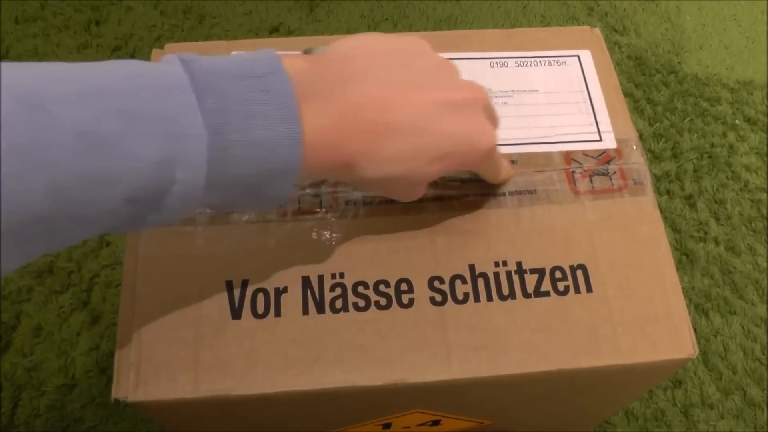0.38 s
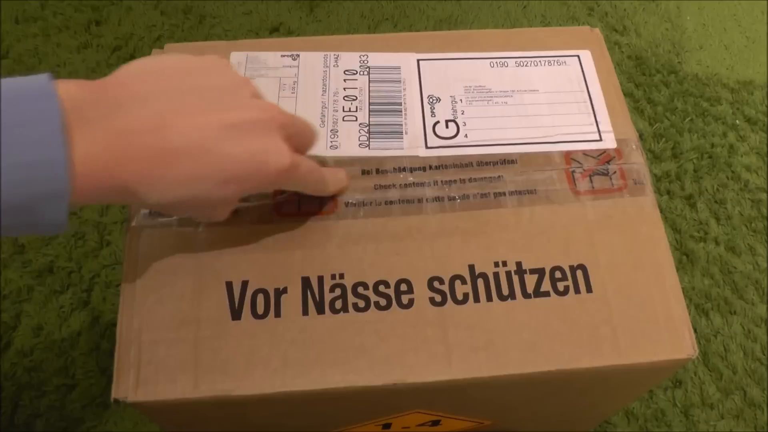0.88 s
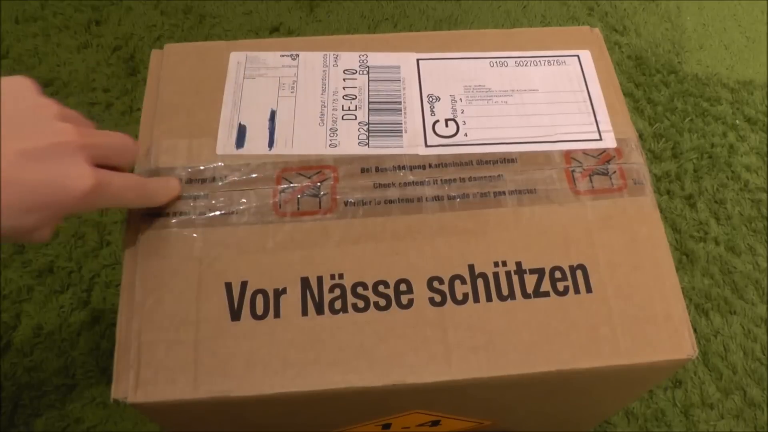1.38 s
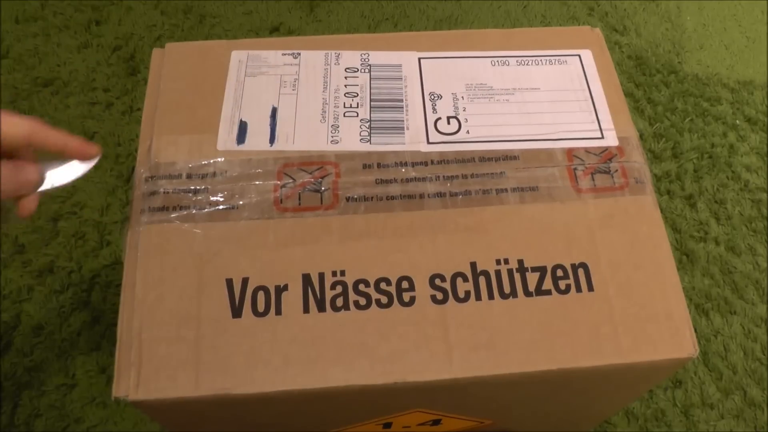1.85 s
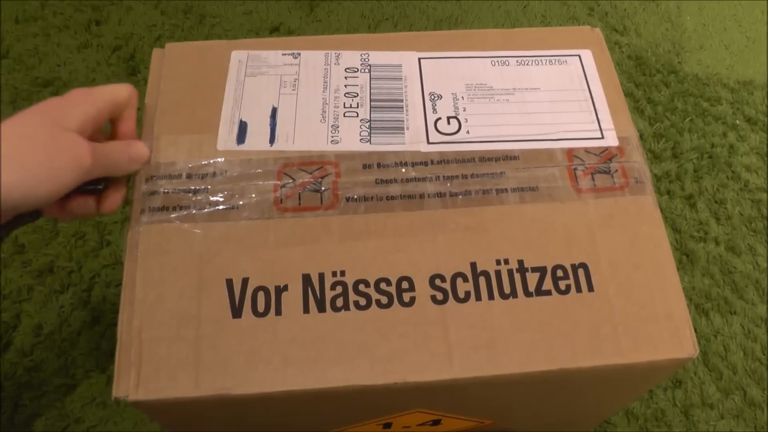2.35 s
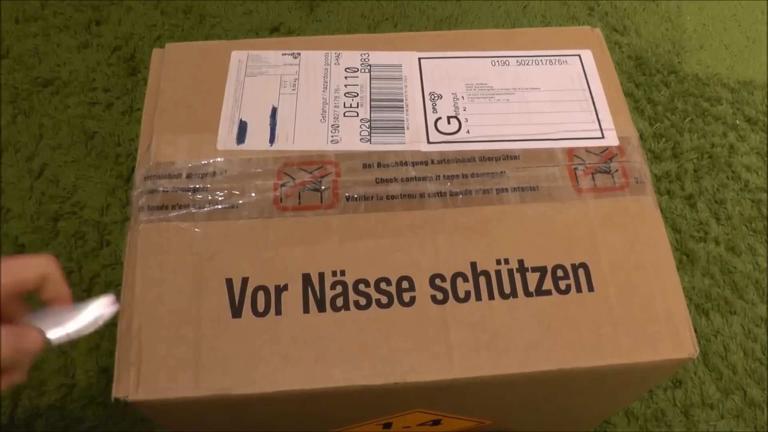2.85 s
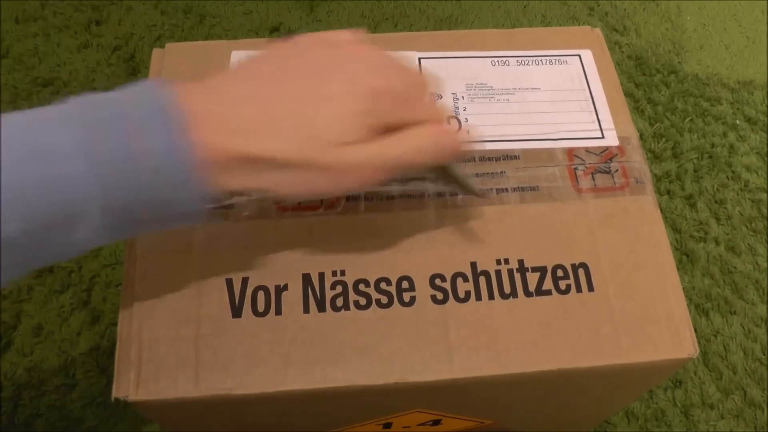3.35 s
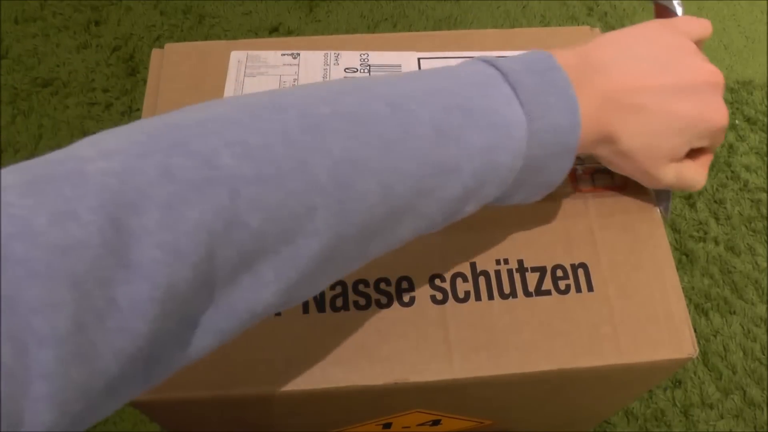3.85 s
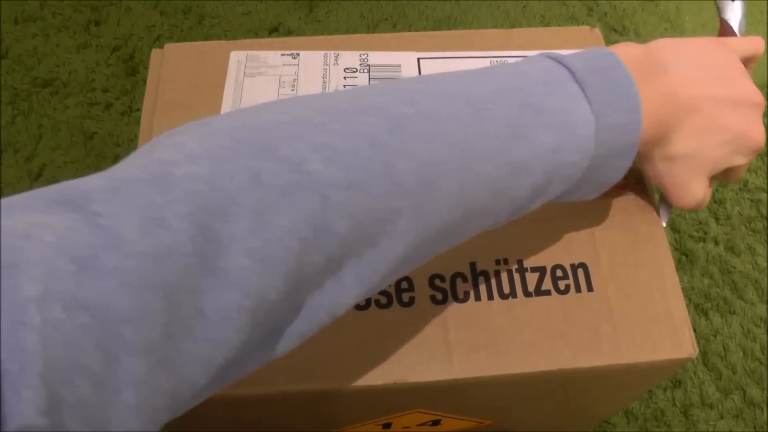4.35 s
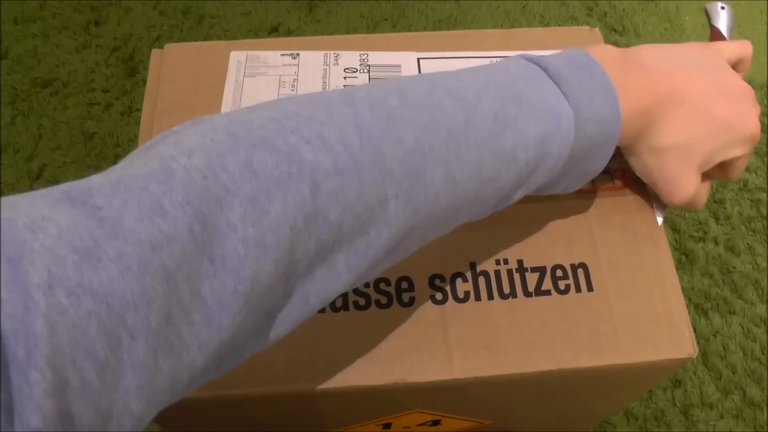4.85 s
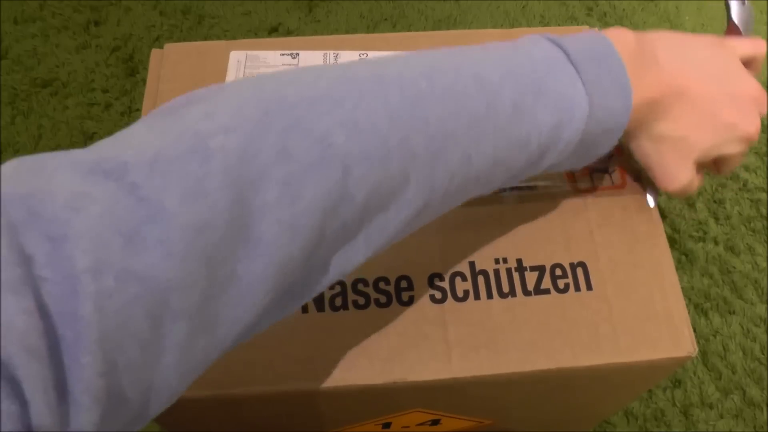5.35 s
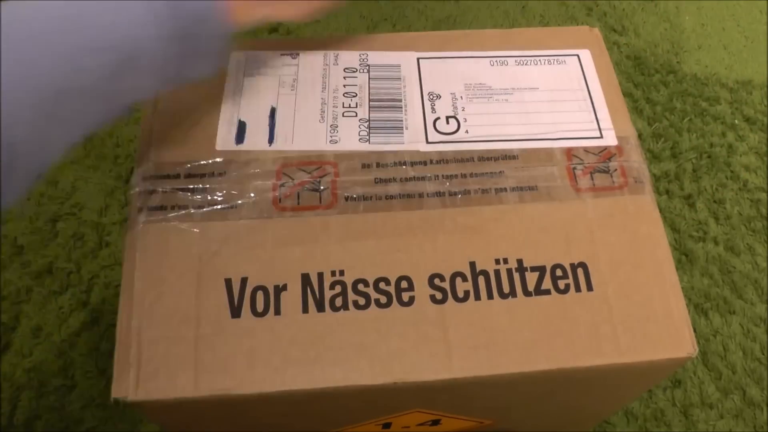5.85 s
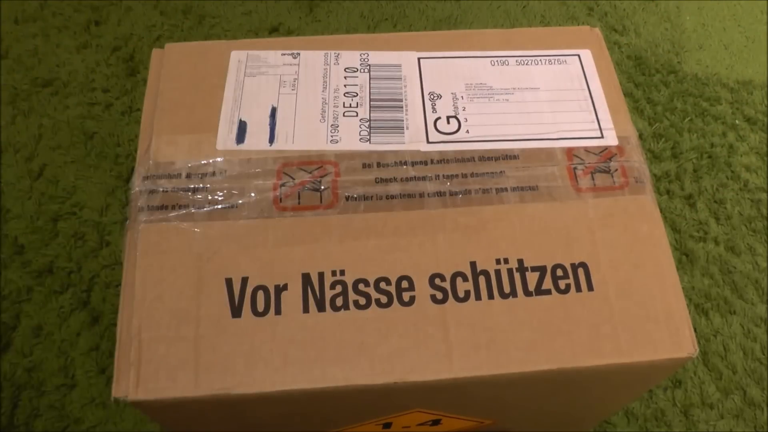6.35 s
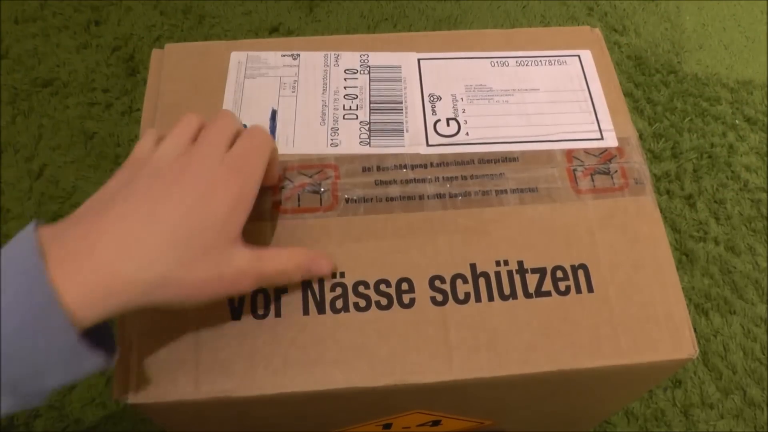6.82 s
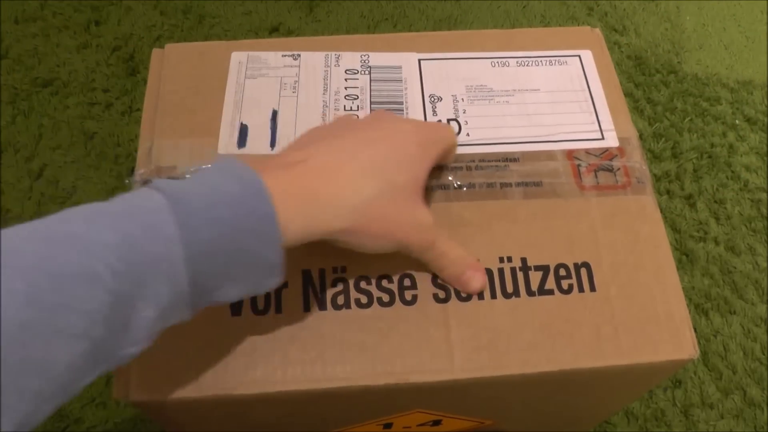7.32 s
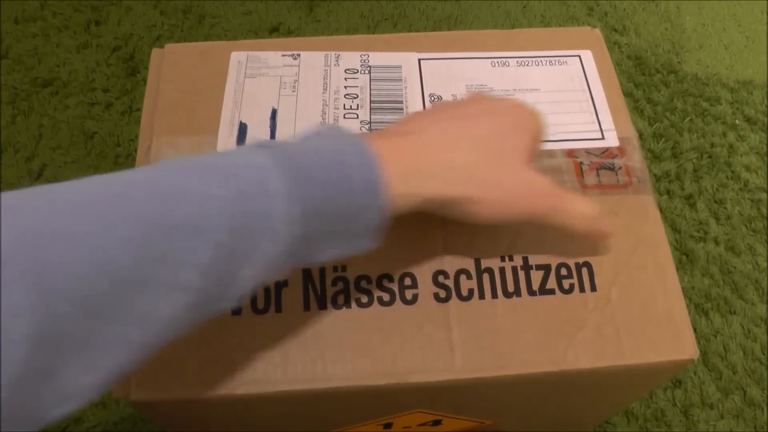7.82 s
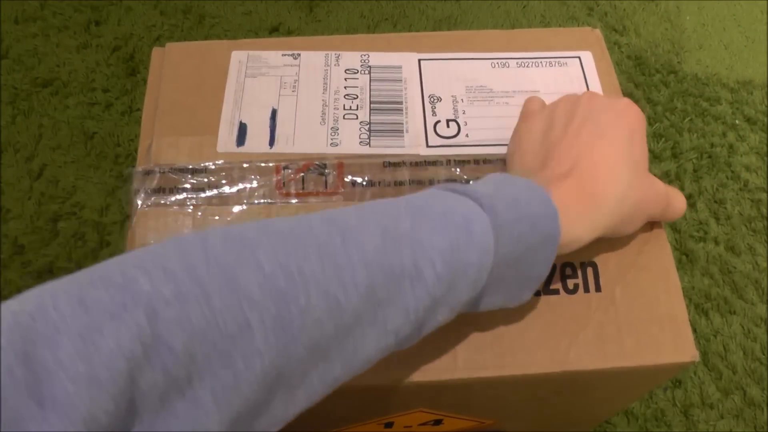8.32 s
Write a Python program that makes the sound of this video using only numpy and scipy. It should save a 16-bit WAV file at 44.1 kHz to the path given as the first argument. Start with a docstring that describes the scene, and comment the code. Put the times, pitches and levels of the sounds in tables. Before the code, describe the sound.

Close up in a small, soft, quiet room, a knife rips along the tape of a cardboard box: dense bright snaps, rasping scrape, a tiny rising squeak and hollow box thumps. After a heavy knock and a lull come another hard snap, faint sleeve rubs and small clicks, a short cut, then hand raps, dry rubbing and a final sharp crack.

```python
"""In a small, soft, quiet room a knife slits the tape on a cardboard box lying on a carpet, close below a camera;
then a hand raps the box and prises at its flaps. The blade sticks and slips: each snap is a burst of noise that
clicks brightly, and the ringing box modes thump a moment later; between snaps runs of small snaps judder.
Dense random slips make the scrape of blade, hand and sleeve, a rising harmonic chirp the squeal of blade on tape.
Blows ring the same box modes; short noise echoes give the room, and coloured noise its hush."""
import sys
import numpy as np
from scipy import signal
from scipy.fft import rfft, irfft, next_fast_len
from scipy.io import wavfile
from scipy.ndimage import uniform_filter1d, map_coordinates

SR = 44100
rng = np.random.default_rng(int(sys.argv[2]) if len(sys.argv) > 2 else 0)


def to_wav(s):
    """Save 16-bit WAV."""
    ch = np.atleast_2d(s).T  # columns
    pcm = np.round(np.clip(ch, -1, 1) * 32767)  # PCM
    wavfile.write(sys.argv[1], SR, pcm.astype(np.int16))


def how_loud(loudness_db):
    """Turn decibels into a plain amplitude multiplier (0 dB gives 1, 20 dB gives 10)."""
    steps = np.asarray(loudness_db, float) / 20
    return 10 ** steps


N = 383669

# panels and air of the box: (mode [Hz], level [dB], ring time [s]), scattered and scaled by each push
BOX_MODES = [(70, -7.5, .2), (93.5, 1.5, 0.14), (118.2, 4, 0.46), (135.3, -13.5, 0.36), (154, 7, 0.062),
             (199.3, 5.5, 0.22), (246, 4, 0.14), (304.6, -3.5, 0.25), (337, -6, 0.42), (370, -2.5, 0.22),
             (429.3, -4, 0.23), (484.6, 2, 0.034), (520, -3, 0.057), (580, -2.5, 0.05), (651, -6.5, 0.2),
             (710, -1.5, 0.08), (797, -2, 0.045), (902, -11.5, 0.088), (1058, -7, 0.074), (1197, -5.5, 0.1),
             (1286, -6, 0.04)]
# colour of bright sounds at the microphone ports: (frequency [Hz], density [dB per Hz])
BRIGHT_COLOUR = [(700, 2), (1200, 9), (2000, 5), (3300, -7.5), (4400, -16), (5300, -12), (6500, -5),
                 (7200, -10), (7700, -24), (8300, -11), (10000, -15), (13000, -22), (15500, -33),
                 (16600, -65)]

OPPOSITE = np.array([[1], [-1]])  # left and right in opposite sense


def colour(x, points):
    """Weight the spectrum by (Hz, dB) points, joined along log frequency."""
    size = next_fast_len(x.shape[-1])
    hz, db = np.transpose(points)
    bins_hz = np.arange(size // 2 + 1) * SR / size
    gain = how_loud(np.interp(np.log(bins_hz + 1), np.log(hz), db))
    return irfft(rfft(x, size) * gain, size)[..., :x.shape[-1]]


def unit(x):
    """Scale to rms 1."""
    return x / np.sqrt(np.mean(x ** 2))


def peak(x, db):
    """Scale to a peak level."""
    return x * how_loud(db) / np.abs(x).max()


def add(out, s, x):
    """Mix x into out from time s."""
    i = int(s * SR)
    out[..., i:i + x.shape[-1]] += x[..., :N - i]


def split(x):
    """The middle and the bright part of a sound, parted at 4400 Hz."""
    return [signal.sosfilt(signal.butter(4, 4400, kind, fs=SR, output="sos"), x) for kind in ("low", "high")]


def ring(centre_hz, octaves, t60_s, push, chance, seconds):
    """Box modes near the centre ring under a push; each ring time follows the root of its ratio to the centre's."""
    hz, db, t60 = np.transpose(BOX_MODES)[:, :, None]
    t = np.arange(int(seconds * SR)) / SR
    nearness = np.exp(-.5 * (np.log2(hz / centre_hz) / octaves) ** 2 + .7j * chance[2])  # with a random phase
    gain = how_loud(db + 3.34 * chance[0]) * nearness
    t60 = t60_s * np.sqrt(t60 / np.interp(centre_hz, hz[:, 0], t60[:, 0]))
    pole = np.exp((2j * np.pi * hz * (1 + 0.027 * chance[1]) - np.log(1000) / t60) / SR)
    modes = (gain * np.cumprod(np.repeat(pole, len(t), axis=1), axis=1)).imag.sum(axis=0)
    pushed = signal.fftconvolve(modes, push)[:len(t)]
    # a panel radiates its change of speed, so little lies under its modes
    keep = np.exp(-2 * np.pi * 0.37 * centre_hz / SR)
    radiated = signal.lfilter([1, -2, 1], [1, -2 * keep, keep ** 2], pushed)
    return radiated * np.cos(np.pi / 2 * t / seconds)


def snaps():
    """Tape and fibre let go in a millisecond or two of crackle, then the box answers with a short thump."""
    # clearest snaps: (time [s], click peak [dB], middle peak [dB], box thump peak [dB]); clicks before panning
    clearest = [(0.0614, -9, -18, -17), (0.0672, -8.5, -23, -14), (0.0942, -12, -20, -35),
                (0.1058, -5.5, -25, -20), (0.1111, -12, -22, -30), (0.1256, -11, -21, -23),
                (0.1456, -6, -22, -20), (0.1588, -7.5, -17, -17.5), (0.2334, -7.5, -19, -18.5),
                (0.2497, -11, -25, -28), (0.2673, -20, -25, -20.5), (0.2773, -8, -17, -17.5),
                (0.3023, -8, -20, -16), (0.3204, -22, -28, -28), (0.3305, -10.5, -20, -19),
                (0.3405, -15, -26, -18), (0.381, -9, -25, -18), (0.398, -9, -21, -16),
                (0.4099, -9, -29, -16.5), (0.4254, -7, -28, -14.5), (0.5103, -5.5, -25, -10),
                (0.5199, -3.5, -22, -12), (0.596, -4, -29, -16), (0.605, -12, -23, -18),
                (0.615, -3, -43, -18), (0.6624, -13, -28, -25), (0.678, -11, -18, -14),
                (0.6877, -6, -16.5, -18), (0.6945, -8.5, -19, -17), (0.6996, -7, -21, -15),
                (0.7215, -9, -32, -17), (0.74, -10, -34, -31), (0.7607, -10, -28, -21),
                (0.8204, -7.5, -23, -22.5), (0.828, -14, -30.5, -22), (0.8627, -11.5, -36, -30),
                (0.8737, -16.5, -40.5, -21), (0.9363, -7.5, -30, -22), (1.0293, -6.5, -31, -20),
                (1.1343, -14, -27, -17), (1.1602, -16, -22, -15.5), (1.3102, -16.5, -44, -42),
                (1.3818, -14, -22, -31), (1.3898, -10, -19, -25), (1.399, -11, -29, -17),
                (1.4126, -13, -20, -22), (1.515, -22, -35, -43), (1.573, -16, -18, -22),
                (1.6131, -11, -15.5, -4.5), (2.0974, -23, -22, -26), (2.253, -29, -37, -55),
                (2.4, -12, -31, -31), (2.4391, -23, -36, -29), (2.4953, -16, -13, -20),
                (2.5019, -6.5, -16, -17), (2.5188, -13, -21, -16), (2.5317, -6, -4, -2),
                (2.5473, -13, -13, -7), (2.5541, -5, -29, -21), (2.6, -14.5, -29, -11),
                (2.7239, -13.5, -30, -26), (2.9669, -13, -25.5, -43), (3, -27.5, -53, -53),
                (3.3039, -37.5, -53, -55), (3.4197, -26, -41, -48), (3.7248, -25, -41, -47),
                (3.7294, -20, -28.5, -34), (4.2326, -44, -62, -51), (4.3234, -38, -65, -48),
                (4.6788, -28, -45.5, -28), (4.6828, -22.5, -31.5, -35), (4.8737, -33, -40, -55),
                (4.9814, -35, -56, -45), (5.249, -26.5, -25.5, -32), (5.3196, -33, -50, -47),
                (5.4707, -17, -18.5, -24), (5.4793, -11.5, -31, -41), (5.4952, -16.5, -19, -43),
                (5.5426, -16, -24, -27), (5.5543, -22, -24, -19), (5.597, -21, -23, -18),
                (5.667, -38, -27, -35), (5.896, -29, -41, -43), (6.247, -40.5, -53, -59),
                (6.3684, -19.5, -42, -22), (6.6975, -15, -22, -22), (6.6992, -8, -22, -15),
                (6.7727, -22.5, -28, -29), (6.7877, -39, -13, -21), (6.797, -13, -35, -21),
                (6.8468, -23, -43, -35), (6.8595, -24, -44, -30), (6.8729, -11.5, -23, -18),
                (6.9201, -9.5, -44, -23), (6.9606, -17.5, -46, -46), (7.084, -19, -53, -39),
                (7.1226, -16, -33, -34), (7.1448, -25, -32, -12), (7.1776, -34, -54, -38),
                (7.225, -33, -48, -32), (7.4555, -30, -25, -32), (7.5404, -17, -44, -25.5),
                (7.6042, -22, -46, -52), (7.7492, -17.5, -15, -38), (7.7809, -34, -36, -22),
                (8.1387, -26, -35, -36), (8.305, -24, -21.5, -47), (8.3544, -29, -29, -34),
                (8.4483, -41, -31, -40), (8.6082, -10.5, -14, -27), (8.6431, -3.5, -3, -29),
                (8.6553, -9, -8.5, -14)]
    rows = clearest + judder()
    rise_s, width_s, tail_s = .0006, .00062, .007  # the width varies from snap to snap
    out, t = np.zeros((2, N)), np.arange(-64, 448) / SR
    family = rng.standard_normal(len(t))
    noise = rng.standard_normal((len(rows), len(t)))
    chance = rng.standard_normal((len(rows), 3, len(BOX_MODES), 1))
    burst = np.exp(-(t / (width_s * how_loud(3.2 * chance[:, 2, 0]))) ** 2)
    tail = .13 * np.exp(-np.abs(t) / tail_s)
    shape = np.clip(t / rise_s + 1, 0, 1) * (burst + tail)
    # the same blade and tape give all snaps a family likeness
    noise = noise + .7 * family
    middle, bright = split(colour(noise * shape, BRIGHT_COLOUR))
    push = np.hanning(int(0.00062 * SR) + 3)
    for (s, db, middle_db, thump_db), mid, high, c in zip(rows, middle, bright, chance):
        pan = how_loud(0.29 * c[0, 0, 0] * OPPOSITE)
        add(out, s + rise_s + t[0], pan * (peak(high, db) + peak(mid, middle_db)))
        thump = ring(358, 0.63, 0.063, push, c, seconds=0.038)
        add(out, s + 0.0014, peak(thump, thump_db))
    return out


def judder():
    """The blade judders along in runs of small quick snaps at uneven gaps and sizes; gives their rows."""
    # (start [s], end [s], rough rate [snaps per s], click peak [dB], thump peak [dB]), levels before the scatter
    runs = [(0.068, 0.164, 57, -30.5, -25.5), (0.386, .5, 120, -24.5, -30), (0.703, .852, 187, -13.5, -21),
            (.883, .917, 214, -16, -22), (.928, .962, 270, -17.5, -20), (.972, 1.001, 200, -15.5, -22),
            (1.012, 1.09, 172, -20, -24), (1.131, 1.178, 165, -19.5, -25.5),
            (1.197, 1.37, 65.4, -26.5, -44), (1.483, 1.6, 30.5, -21, -36), (2.562, 2.89, 60, -24, -41),
            (5.355, 5.47, 80.6, -34.5, -41), (5.498, 5.63, 102, -25, -28), (6.927, 6.99, 69, -22.5, -29),
            (7.063, 7.384, 51, -25, -24), (7.488, 7.643, 23.2, -28, -51), (8.278, 8.47, 34, -34.5, -37)]
    middle_db, spread_db, unevenness = -11.5, 2.5, .22  # middle relative to the click; scatter of size and gap
    rows = []
    for start, end, per_s, db, thump_db in runs:
        c = rng.standard_normal((64, 4))
        times = start + np.cumsum(np.exp(unevenness * c[:, 0])) / per_s
        levels = np.array([db, db + middle_db, thump_db]) + spread_db * np.clip(c[:, 1:], -3, 1.6)
        rows += [(s, *level) for s, level in zip(times, levels) if s < end]
    return rows


def grit(per_s, spread_db):
    """Tiny random slips with a long-tailed size and either sign."""
    draw = rng.random((3, N))
    size = how_loud(spread_db * np.minimum(-np.log(draw[1] + 1e-9), 5))
    slip = np.clip((per_s / SR - draw[0]) * SR / 50, 0, 1)
    return slip * size * np.sign(draw[2] - .5)


def shifting(x, spread_db, hold_s, width_hz):
    """The colour drifts as the contact moves: patches of the spectrum swell and sink on their own."""
    hz, t, z = signal.stft(x, SR, nperseg=512)
    patches = rng.standard_normal((64, 512))
    place = np.meshgrid(hz / width_hz, t / hold_s, indexing="ij")
    gain = how_loud(spread_db * map_coordinates(patches, place, order=1))
    return signal.istft(z * gain, SR, nperseg=512)[1][:N]


def scrape_levels():
    """Gains of the six scrape layers as strokes of blade or hand pass, with soft brushes on top."""
    # one list for each stroke: (time [s], drag on the panels [dB], rasp [dB], bright crackle [dB])
    strokes = [
        [(0.0, -54, -61, -56), (0.11, -36.5, -49, -40), (0.16, -44.5, -47, -45), (0.234, -37.5, -52, -47),
         (0.282, -39.5, -53, -46), (0.348, -37.5, -43, -39), (0.454, -33.5, -57, -42), (0.526, -40, -36, -34),
         (0.66, -37, -46, -41)],
        [(0.67, -40, -40, -38), (0.738, -32.5, -40, -43), (0.868, -36.5, -43, -39), (0.948, -37.5, -50, -39.5),
         (1.124, -42.5, -38.5, -37.5), (1.2, -38.5, -45, -42)],
        [(1.21, -38, -46, -44.5), (1.486, -34, -37.5, -40.5), (1.536, -38, -41, -41.5),
         (1.596, -28.5, -33, -39.5), (1.672, -36.5, -56, -52.5), (1.754, -47, -52, -62.5),
         (1.846, -58.5, -75, -69.5), (2.09, -70, -73.5, -77.5)],
        [(2.1, -45.5, -62, -54), (2.146, -41, -50, -57), (2.264, -48, -52, -49), (2.49, -42.5, -49, -45.5)],
        [(2.5, -35, -34.5, -28), (2.618, -30, -30, -33.5), (2.674, -40.5, -41.5, -42),
         (2.736, -34.5, -37, -36.5), (2.804, -42.5, -37, -36.5), (2.904, -44, -60, -50.5),
         (2.96, -66, -61, -60)],
        [(2.97, -42, -58, -50), (3.106, -60.5, -69, -64.5), (3.18, -57, -60, -69), (3.37, -60, -66, -59.5),
         (3.488, -53.5, -63, -62), (3.71, -66, -65, -60)],
        [(3.73, -50.5, -63, -46.5), (3.924, -57.5, -70, -66), (4.122, -62, -71, -66.5),
         (4.276, -58.5, -66, -63.5), (4.494, -58.5, -71.5, -63), (4.66, -53.5, -74, -75)],
        [(4.68, -46.5, -65, -62.5), (4.97, -64, -63, -72), (5.106, -46.5, -57, -61), (5.24, -53, -63, -61)],
        [(5.25, -47, -51, -60), (5.326, -40, -51, -52), (5.44, -33, -40, -39), (5.498, -35.5, -35, -48),
         (5.548, -26, -45, -32.5), (5.648, -39, -42, -48.5), (5.69, -48.5, -56, -55), (5.85, -56, -67, -65)],
        [(5.86, -51.5, -61, -64), (5.968, -53.5, -64, -65), (6.198, -62.5, -66, -75), (6.35, -52, -62, -67)],
        [(6.36, -50, -52, -43.5), (6.49, -51.5, -64, -60.5), (6.685, -61.5, -62.5, -78)],
        [(6.695, -26, -59, -42), (6.745, -35.5, -59, -46), (6.867, -34.5, -55, -46), (6.923, -36, -43, -42),
         (7.04, -45, -51, -46.5)],
        [(7.05, -32, -42, -41.5), (7.146, -35.5, -42, -37.5), (7.242, -35, -39, -36.5),
         (7.346, -28, -43, -36.5), (7.4, -37, -44, -43)],
        [(7.41, -36, -46, -40), (7.542, -45.5, -52, -52), (7.74, -45.5, -55, -52.5)],
        [(7.755, -35, -42, -35), (7.801, -32.5, -46, -36), (7.921, -35, -48, -32), (7.999, -38, -43.5, -40),
         (8.161, -37, -44, -42.5), (8.297, -46.5, -46, -56), (8.421, -51.5, -48.5, -56), (8.6, -49, -65, -59)],
        [(8.612, -40, -53, -52), (8.7, -56, -50, -40)],
    ]
    # strokes over the empty middle wake the hollow more; the blade rasps sharper than skin, skin hisses airier:
    # (hollow over panels [dB], sharp edge of the rasp over crackle [dB], airy top over crackle [dB])
    stroke_place = [(3, -4, -0.5), (7, -2.5, 2), (-13, 2, 0.5), (-12, -3.5, -0.5), (-20, -3, 1),
                    (-8.5, -7, 0.8), (-3, -9, -2), (-10, -4, -.1), (-10.5, -8, -0.3), (-3, -3, .1),
                    (10.5, -5, 1), (-2.5, -9.5, 1.5), (-6, -18, 7.5), (-5, -10.5, -1.3), (-9, -16.5, 2),
                    (-1.5, 10.5, 3.5)]
    # sleeve or finger over the board: (middle [s], length [s], drag [dB], rasp [dB], crackle [dB]), at the swell's top
    brushes = [(3.146, 0.14, -53.5, -55, -65), (4.142, 0.12, -41, -56, -58), (5.1, 0.087, -47, -60, -59),
               (5.046, 0.16, -39, -53, -54), (6.16, 0.13, -54, -56, -76), (2.6, 0.13, -37.5, -48, -57),
               (2.72, 0.045, -34.5, -47, -53), (6.322, 0.088, -57, -64, -72)]
    rows = []
    for stroke, (deep, edge, air) in zip(strokes, stroke_place):
        for s, drag, rough, crisp in stroke:
            rows.append((s, drag + deep, drag, rough, crisp + edge, crisp, crisp + air))
    s, *columns = np.transpose(sorted(rows))
    t = np.arange(N) / SR
    hollow, panels, rasp, sharp, crackle, airy = (how_loud(np.interp(t, s, c)) for c in columns)
    for middle_s, length_s, drag, rough, crisp in brushes:
        swell = np.hanning(int(length_s * SR)) ** 1.44
        layers = (panels, drag), (rasp, rough), (sharp, rough - 11.5), (crackle, crisp), (airy, crisp)
        for layer, db in layers:
            add(layer, middle_s - length_s / 2, how_loud(db) * swell)
    return hollow, panels, rasp, sharp, crackle, airy


def scrape():
    """Dense slips drone through the box, rasp in the board and crackle in the air; the grip keeps changing."""
    # colour of the rasp in the board: (frequency [Hz], density [dB per Hz])
    panel_colour = [(1000, 4.5), (1300, -9), (1490, -30.5), (1650, 0.5), (1900, -2), (2300, -8.5),
                    (3500, -6.5), (4400, -17.5), (5200, -8)]
    hollow, panels, rasp, sharp, crackle, airy = scrape_levels()
    holds = np.repeat(rng.standard_normal(N // 500 + 1), 500)
    grip = how_loud(1.14 * unit(uniform_filter1d(holds, size=300)[:N]))
    drag = grip * grit(1500, 1.2)
    still = np.zeros((3, 1, 1))  # no scatter of the modes
    deep, wide = (unit(signal.fftconvolve(drag, ring(hz, octaves, t60, np.ones(1), still, seconds=.25))[:N])
                  for hz, octaves, t60 in ((200, 0.33, 0.14), (553, 1.0, 0.04)))
    slips = grit(7000, 0.54)
    smear = rng.standard_normal(300) * np.exp(-np.arange(300) / (0.00013 * SR))
    smeared = signal.fftconvolve(slips, smear)[:N]
    slips = grip * (unit(slips) + .35 * unit(smeared))
    slips = shifting(slips, spread_db=4.26, hold_s=.045, width_hz=832)
    # the board speaks a little after the air
    board = np.roll(colour(slips, [(500, -24.5)] + panel_colour + [(7500, -53.5)]), shift=40)
    dull, keen = (signal.sosfilt(signal.butter(3, 2230, kind, fs=SR, output="sos"), unit(board))
                  for kind in ("low", "high"))
    crisp = unit(split(colour(slips, BRIGHT_COLOUR))[1])
    air_hz = 7700
    top = colour(crisp, [(air_hz / 1.1, -40), (air_hz, 0), (2 * air_hz, 4.5)])
    in_box = hollow * deep + panels * wide
    in_board = rasp * dull + sharp * keen
    return in_box + in_board + crackle * (crisp - top) + airy * top


def squeal():
    """Fast regular stick-slip gives a short harmonic chirp that rises and levels off; the overtones die first."""
    # the blade squeals on the tape in fresh grips: (time [s], level of the fundamental [dB])
    grips = [(.553, -21.5), (0.586, -30.5), (.62, -44)]
    # fundamental and overtones at the loudest moment: (relative level [dB])
    overtones_db = [-0.5, -8, -17, -1, -9.5, -22.5, -10, -10]
    start_hz, rise_hz_s, top_hz = 1540, 4000, 1700  # before the wobble
    attack_s, hold_s, fade_db_s = 0.0043, 0.011, 903  # the attack climbs 30 dB
    first_s = grips[0][0]
    t = np.arange(first_s - .01, grips[-1][0] + 0.065, 1 / SR)
    hz = np.minimum(start_hz + rise_hz_s * np.maximum(t - first_s - hold_s, 0), top_hz)
    wobble = 1 + 0.24 * uniform_filter1d(rng.standard_normal(len(t)), size=40)
    phase = 2 * np.pi * np.cumsum(hz * wobble) / SR
    level = np.max([db - 30 * np.maximum(s - t, 0) / attack_s - fade_db_s * np.maximum(t - s - hold_s, 0)
                    for s, db in grips], axis=0)
    tone = np.zeros(len(t))
    for k, overtone_db in enumerate(overtones_db):
        early_fade = 0.46 * min(k, 1) * (level - level.max())  # none for the fundamental
        tone += how_loud(level + overtone_db + early_fade) * np.sin((k + 1) * phase)
    out = np.zeros(N)
    add(out, t[0], np.sqrt(2) * tone)
    return out


def knocks():
    """Each blow lands somewhere else, picks its own share of the modes and rattles the layers of the board."""
    # blows on the box: (time [s], peak [dB], centre of the ring [Hz], spread [octaves], nominal ring time [s])
    blows = [(0.0648, -8, 248, 0.37, .044), (0.4202, -19, 288, 0.27, 0.21), (0.5119, -21.5, 276, 0.84, 0.6),
             (1.6155, -11, 276, 0.17, 0.14), (2.0971, -12.5, 486, 0.28, 0.061),
             (2.284, -30, 333, 1.2, 0.11), (2.494, -9.5, 525, 0.77, 0.4), (2.5306, -6.5, 410, 1.24, 0.3),
             (2.6365, -12.5, 420, 0.85, 0.22), (2.8145, -30, 504, .75, 0.29),
             (2.8467, -25, 540, 0.39, 0.26), (2.8738, -35, 443, 0.42, 0.11), (2.966, -27, 670, 0.584, 0.16),
             (3.4226, -24, 570, 0.37, 0.029), (3.7233, -24, 342, 1.5, 0.11),
             (4.4518, -41.5, 167, 0.75, 0.22), (4.6788, -23.5, 580.7, 0.94, 0.081),
             (4.876, -30, 342, 1.5, 0.19), (5.2487, -25.5, 540, .41, .07), (5.471, -12, 560, 0.51, 0.094),
             (5.5, -16, 200, 1.1, 0.067), (5.576, -17.5, 570, 0.61, 0.22), (6.355, -15, 297, 0.16, .14),
             (6.3701, -8.5, 302, 0.36, 0.26), (6.374, -18.5, 127, 0.45, 0.13),
             (6.536, -19.5, 120, 0.34, .16), (6.692, -12.5, 202, 0.41, 0.091),
             (6.789, -7, 194, 0.27, 0.078), (6.8713, -9.5, 316, 1.3, .091), (7.049, -24, 1098, 0.46, 0.027),
             (7.0882, -12.5, 240, 0.43, 0.097), (7.1426, -14, 246, .62, 0.12),
             (7.374, -13, 264.6, 1.5, 0.073), (7.4569, -26, 331, 1.2, .034), (7.5576, -24, 380, 0.79, .058),
             (7.7472, -12.5, 320, 1.2, 0.11), (7.778, -6.5, 342, 1.1, 0.05),
             (8.2731, -24.5, 350, 0.25, 0.087), (8.608, -17, 457, 0.57, 0.063),
             (8.6414, -7.5, 390, 1.6, 0.23)]
    contact_cycles = 2.88  # how long a hand shuffles on the board, in cycles of the ring
    out, t = np.zeros(N), np.arange(2400) / SR
    chance = rng.standard_normal((len(blows), 3, len(BOX_MODES), 1))
    rattle = rng.standard_normal((len(blows), len(t)))
    for (s, db, hz, octaves, t60), c, noise in zip(blows, chance, rattle):
        contact_s = contact_cycles / hz
        blow = np.sin(np.pi * np.clip(t * hz / 0.25, 0, 1)) ** 2
        # a long contact is a shuffle rather than a blow
        shuffle = noise * 70 * contact_s * (t / contact_s) * np.exp(-t / contact_s)
        rung = ring(hz, max(octaves, .15), max(t60, .02), blow + shuffle, c, np.clip(t60, .06, .3))
        add(out, s, peak(rung, db))
    return out


def echoes(t60_s, after_s):
    """A decaying noise response of unit energy, one for each channel, that fades in over after_s."""
    t = np.arange(int(t60_s * SR)) / SR
    noise = rng.standard_normal((2, len(t)))
    tail = noise * np.exp(-np.log(1000) * t / t60_s) * np.clip(t / after_s, 0, 1)
    return tail / np.sqrt((tail ** 2).sum(axis=1, keepdims=True))


def port_scatter(mid):
    """Reflections off camera, arm and lid reach the two ports differently and change as the arm moves."""
    # unlike part of the two ports: (frequency [Hz], side minus mid [dB])
    width = [(60, -22), (300, -17.5), (600, -13), (1200, -10), (2400, -47.5), (4400, -33.5), (6500, -11.5),
             (8300, -2.5), (15000, 0.5)]
    scatter = signal.fftconvolve(mid[None], echoes(0.012, 0.00017))[:, :N]
    turns_per_s = 1.7  # steady turning between two scatters
    turn = 2 * np.pi * turns_per_s * np.arange(N) / SR
    side = colour(np.cos(turn) * scatter[0] + np.sin(turn) * scatter[1], width)
    return OPPOSITE * side


def room(mid):
    """The small soft room answers with a short tail, different at each port."""
    tilted = colour(mid, [(100, -3.5), (2000, 9), (12000, 10.0)])
    return how_loud(-18) * signal.fftconvolve(tilted[None], echoes(0.13, 0.0035))[:, :N]


def port_lean(heard):
    """The two ports differ a little in level across the spectrum."""
    # (frequency [Hz], left minus right [dB])
    lean = [(60, -1.9), (300, -2.1), (600, -1.5), (1200, .4), (5000, .4), (9000, -.9), (15000, -1.6)]
    left = colour(heard[0], [(hz, db / 2) for hz, db in lean])
    right = colour(heard[1], [(hz, -db / 2) for hz, db in lean])
    return np.array([left, right])


def hush():
    """Quiet room tone and microphone hiss: coloured noise, partly unlike at the two ports."""
    # (frequency [Hz], relative density [dB per Hz])
    hush_colour = [(15, -58), (25, 2), (97, 8), (349, -6.5), (422, 0), (470, -14.5), (1120, -11.5),
                   (1470, -19.5), (2330, -17.5), (2670, -32), (3150, -30), (4360, -30.5), (12600, -23),
                   (15200, -28), (16500, -34)]
    # (frequency [Hz], side minus mid [dB])
    hush_side = [(60, -0.5), (110, -43), (200, -2), (380, -3.5), (700, -1), (1290, -15), (2380, -12.5),
                 (4400, -2.5), (8120, 4), (15000, 0.5)]
    mid, side = colour(rng.standard_normal((2, N)), hush_colour)
    return how_loud(-54.5) * unit(mid + OPPOSITE * colour(side, hush_side))


def scene():
    """Everything near, its scatter around the ports, the room and the hush."""
    near = snaps() + scrape() + squeal() + knocks()
    mid = near.mean(axis=0)
    heard = near + port_scatter(mid) + room(mid)
    return port_lean(heard) + hush()


def roll_off(x):
    """The treble ends steeply here."""
    return signal.sosfilt(signal.butter(12, 16650, fs=SR, output="sos"), x)


def record(dry):
    """The microphone loses the deep bass, and its level is clipped at full scale."""
    thin = signal.sosfilt(signal.butter(1, 154, "high", fs=SR, output="sos"), dry)
    mix = np.clip(thin, -1, 1)
    return roll_off(mix)


dry = scene()
out = record(dry)
to_wav(out)
```